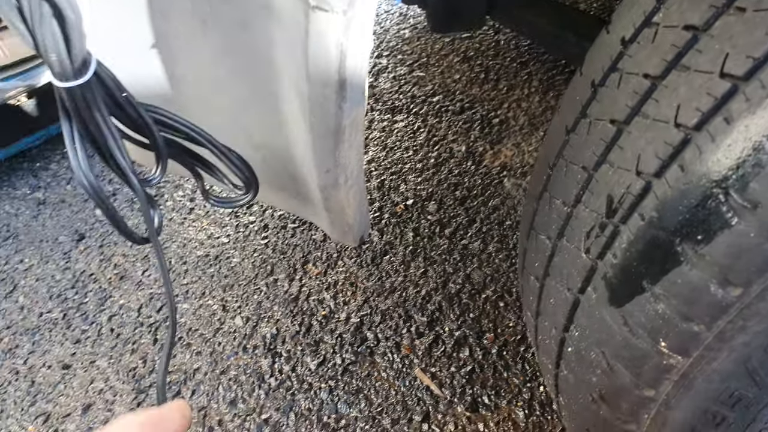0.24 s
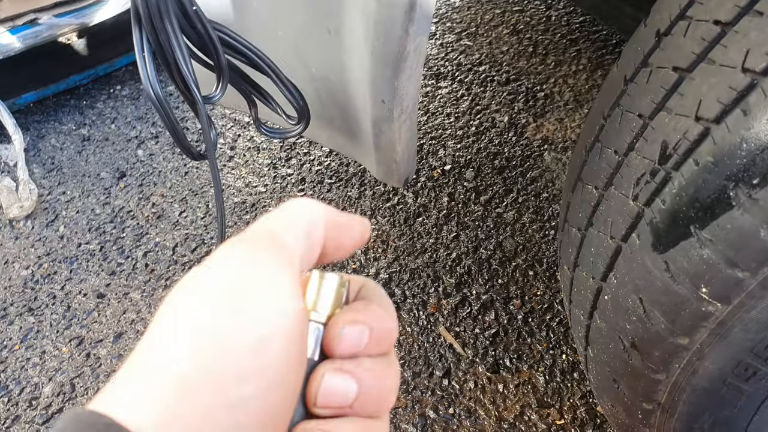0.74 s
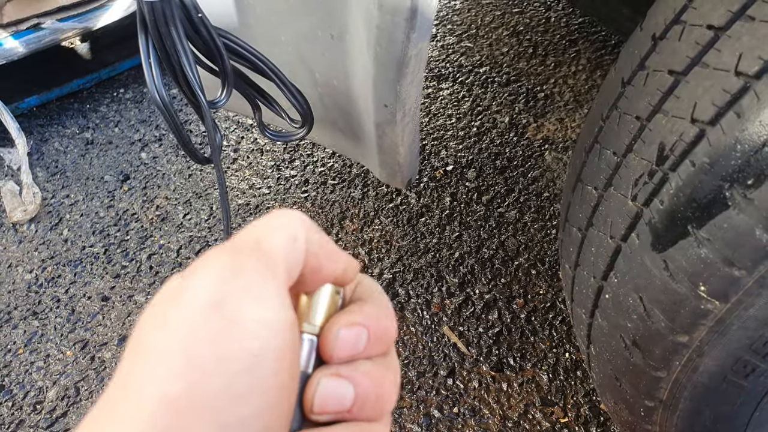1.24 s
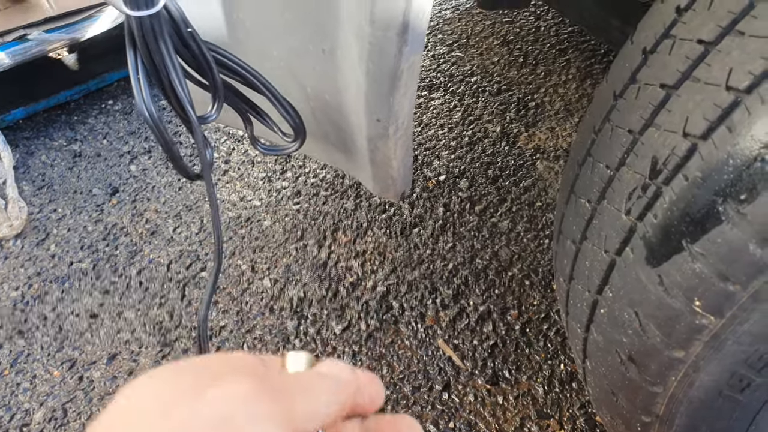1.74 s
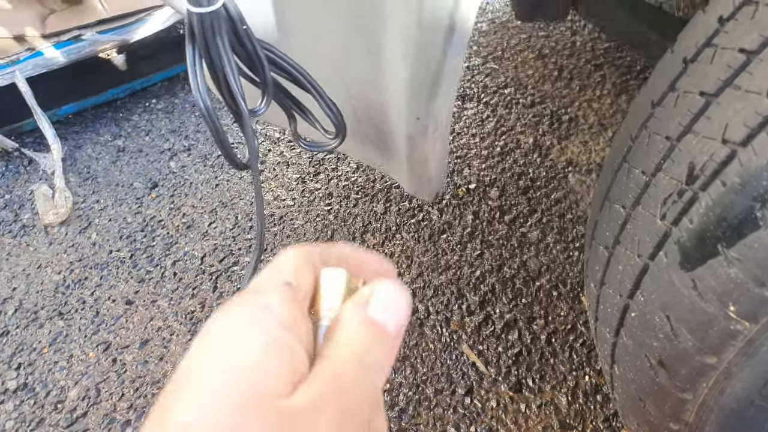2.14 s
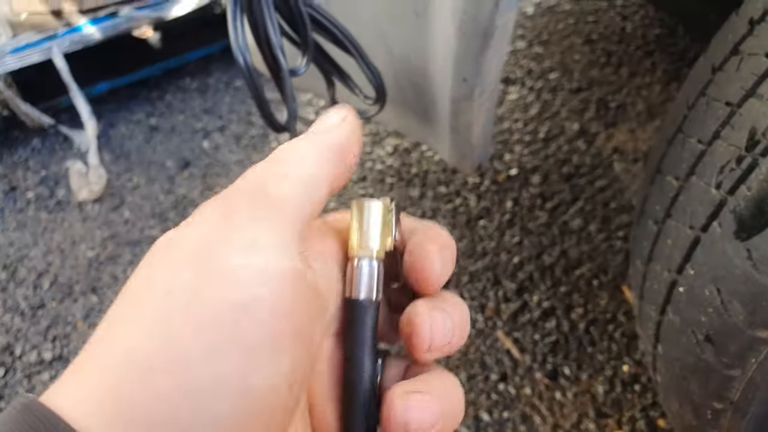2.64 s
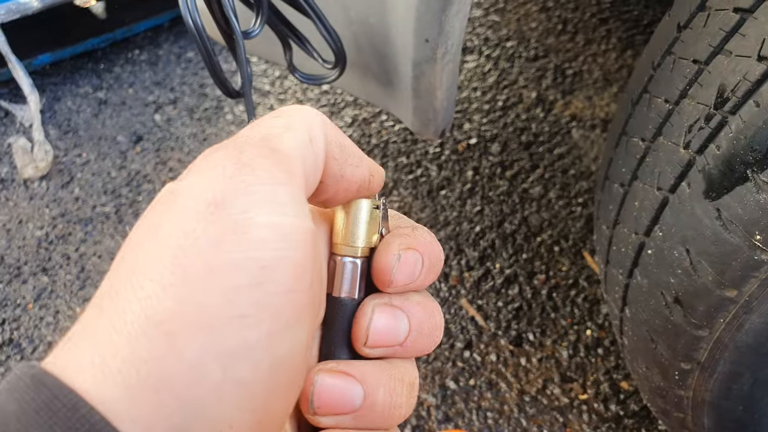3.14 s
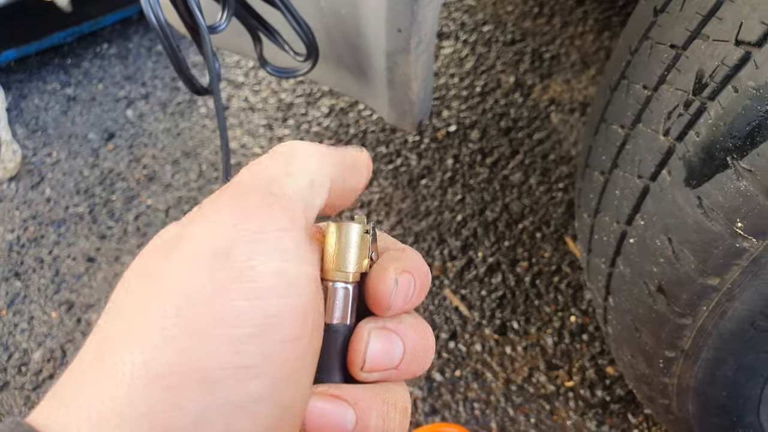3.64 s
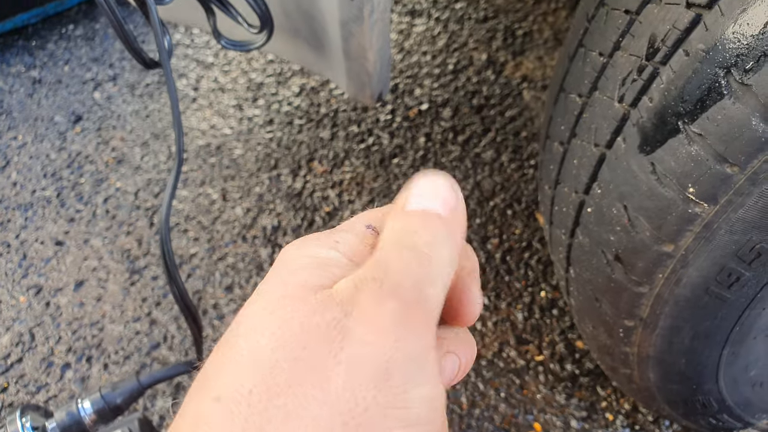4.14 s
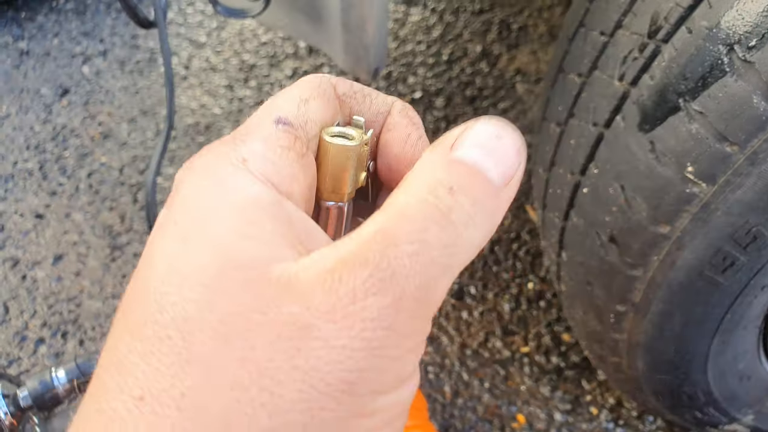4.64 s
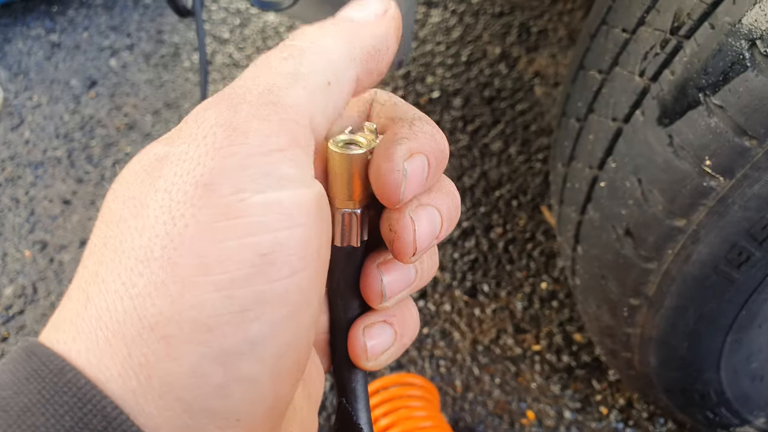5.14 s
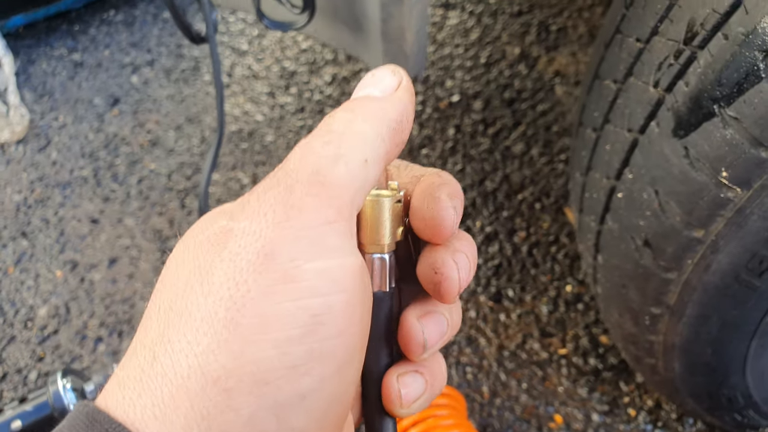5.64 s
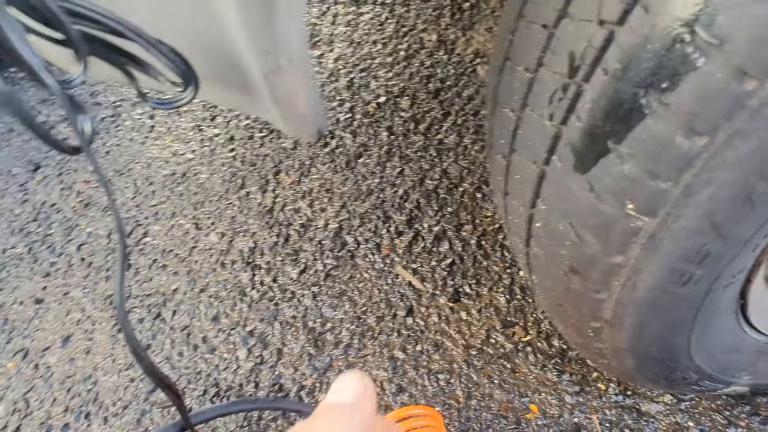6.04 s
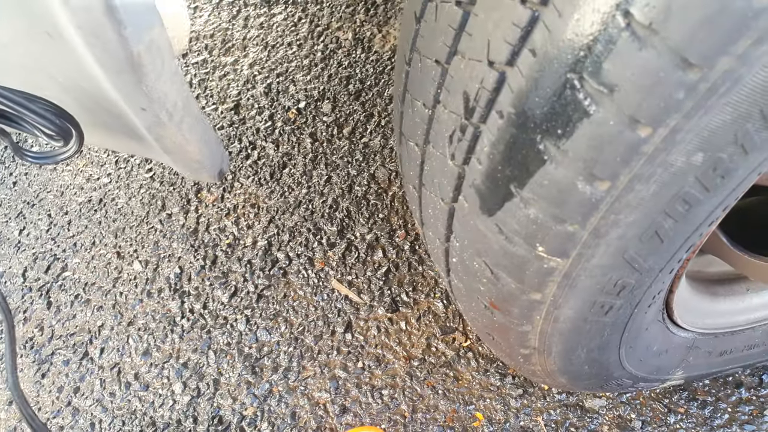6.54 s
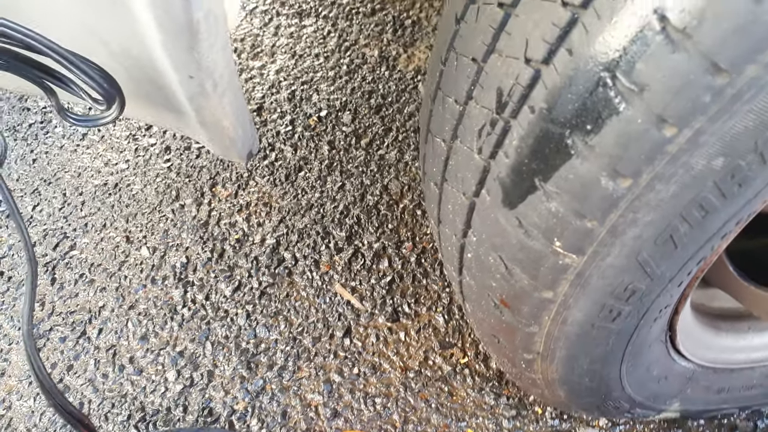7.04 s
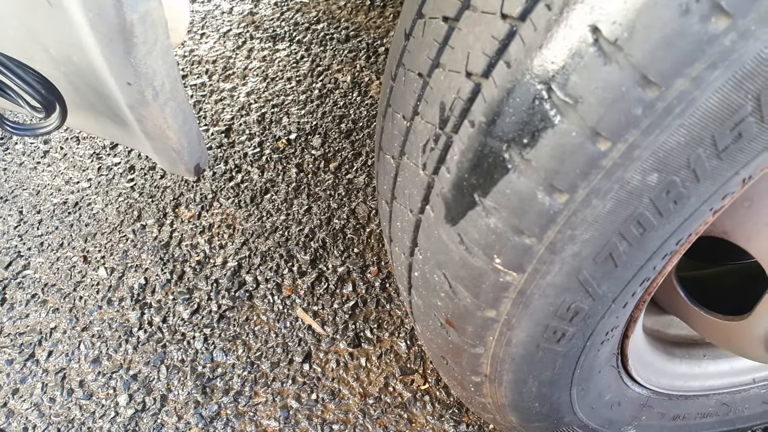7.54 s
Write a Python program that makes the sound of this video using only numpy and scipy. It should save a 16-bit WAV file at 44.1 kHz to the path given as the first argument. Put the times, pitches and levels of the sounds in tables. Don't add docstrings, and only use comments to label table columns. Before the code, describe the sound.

Steady motor hum and rattling valve buzz outdoors beneath a loud, sharp air jet whose hiss shifts as a hand moves around the nozzle.

```python
import sys
import numpy as np
from scipy import signal
from scipy.fft import rfft, irfft
from scipy.io import wavfile
from scipy.ndimage import uniform_filter1d

SR = 44100
rng = np.random.default_rng(int(sys.argv[2]) if len(sys.argv) > 2 else 0)


def magnitude_from_level(level_db):
    exponent = np.asarray(level_db, float) / 20
    return 10 ** exponent


def generate_wav(signal):
    frames = np.transpose(np.atleast_2d(signal))
    scaled = np.clip(frames, -1, 1) * 32767
    pcm = np.round(scaled).astype(np.int16)
    wavfile.write(sys.argv[1], SR, pcm)


N = 343344
SHAFT_HZ = 40

# time in seconds, thumb over the mouth in dB, wrist roll left minus right in dB,
# aim left minus right in dB, flow in dB.
GRIP = [(0.0, 0.7, -4, 3.5, 1.5), (0.43, -1.6, 2, 4.5, -11), (0.6, 0.5, -4.5, 1.5, -2.1),
        (1.58, -0.5, -3.0, 0, 0.5), (1.92, 3, 2.7, 4.5, 0.9), (2.53, -3.5, 11.5, 4.5, -3),
        (2.78, 9, 4.5, -5.5, 0.9), (3.68, -3.1, -2, -2, -2), (4.3, 1.3, -6.5, -6.5, 2.8),
        (4.63, -5.5, 7.5, 4.5, 1.7), (4.99, 0, 8, 3.5, 0), (5.19, -1.5, -0.5, -1, -3),
        (5.78, -3.5, 1.5, -2, 3.5), (6.13, 1, 0, -2, 6.5), (6.38, 1, 4, -2.6, 2), (6.97, -3.5, -4, 1.5, 3),
        (7.1, -5.5, 0, 2.7, -1.5), (7.79, -2, -2, 1.5, -0.5)]


def curve(table):
    seconds, *columns = np.transpose(table)
    return np.array([np.interp(np.arange(N) / SR, seconds, column) for column in columns])


def blur(shape, *widths):
    x = rng.standard_normal(shape)
    for axis, width in enumerate(widths):
        for _ in range(2):
            x = uniform_filter1d(x, max(int(width), 1), axis=axis)
    return x / np.std(x)


def walk(rate_hz):
    count = N // 32 + 2
    return np.interp(np.arange(N) / 32, np.arange(count), blur(count, SR / 32 / rate_hz))


def hum(turns, turned):
    pops = [
        (.3, 1),
        (.732, .61),
    ]
    # delay in ms, gain (negative on the rebound).
    echo_paths = [
        [(-.3, 1), (1.1, -.28), (2.41, -.85), (4.4, -.7), (6.12, -.36), (8.12, -.28)],
        [(0, 1), (1.7, -.56), (2.48, -.3), (4.43, -.56), (5.82, -.06), (6.62, -.12)],
    ]
    # left and right in dB,
    # then left and right in dB once the phone has turned.
    harmonics = [(-45, -43.6, -38.5, -39.5), (-38, -38.5, -38, -38.9), (-39.5, -38.5, -37.5, -37),
                 (-43, -43, -41.5, -41.5), (-39.5, -40.5, -40.5, -41), (-48.5, -50, -50, -52.5),
                 (-38.9, -37.5, -38, -36), (-49.7, -46, -44.5, -45), (-43.2, -38, -41, -37.5),
                 (-66.0, -41.0, -56.4, -39), (-53, -46, -47, -54), (-41, -63, -45.5, -71),
                 (-41, -47, -38.5, -62), (-34, -44, -34, -45.8), (-51, -50, -54, -63),
                 (-45.5, -55, -47, -48), (-47, -63, -52.8, -56.2), (-48, -46, -56.8, -53),
                 (-58, -56, -68, -54), (-54, -42, -69, -45.5), (-43.5, -53, -41, -46),
                 (-51, -54, -48, -61.0), (-44, -43.5, -41, -43), (-69, -59, -59, -53),
                 (-47, -43.6, -52, -42), (-29.5, -44.5, -31, -35), (-45, -49.5, -42.8, -52.5),
                 (-66, -57.5, -43, -61), (-47, -51, -49, -50.2)]
    ring_order, whine_order = 26, 49
    ring_wander_db, whine_db = 2.5, -53

    place = np.linspace(0, 1, num=4097)
    first_pop = pops[0][0]
    shaky = (turns + 0.00075 * walk(57)) % 1
    strike = 0.88 + 0.22 * np.cos(2 * np.pi * (shaky - first_pop - 0.17))
    struck = magnitude_from_level(ring_wander_db * walk(26)) * strike
    drift = (turns + 0.0044 * walk(40)) % 1
    k = np.arange(len(harmonics))[:, None] + 1
    pop_spectrum = -sum(size * np.exp(-2j * np.pi * k * at) for at, size in pops)
    out = []
    for port, paths in enumerate(echo_paths):
        echoes = sum(gain * np.exp(-2j * np.pi * k * ms * SHAFT_HZ / 1000) for ms, gain in paths)
        phase = np.angle(pop_spectrum * echoes)
        waves = np.sqrt(2) * np.cos(2 * np.pi * k * place + phase) * (k != ring_order)
        ring = np.sqrt(2) * np.cos(2 * np.pi * ring_order * (drift - first_pop) - 2 - 3 * port)
        before, after = [
            np.interp(shaky, place, gains @ waves) + gains[ring_order - 1] * struck * ring
            for gains in magnitude_from_level(np.transpose(harmonics)[port::2])
        ]
        whine = magnitude_from_level(whine_db) * np.cos(2 * np.pi * whine_order * shaky)
        out.append(before + (after - before) * turned + whine)
    return np.array(out) * magnitude_from_level(0.18 * walk(50))


def rumble():
    # frequency in Hz, level in dB.
    rumble_colour = [(45, -61), (90, -59.5), (200, -69), (500, -71.5), (700, -68), (1060, -65.5),
                     (1550, -66), (1900, -70.5)]
    hz, db = np.transpose(rumble_colour)
    bins_hz = np.arange(N // 2 + 1) * SR / N
    gain = magnitude_from_level(np.interp(np.log(bins_hz + 1), np.log(hz), db, left=-200, right=-200))
    mid, side = rfft(rng.standard_normal((2, N))) * gain
    apart = np.clip((bins_hz / 650) ** 2, 0, 1.3)
    return np.array([irfft(mid + sign * apart * side, N) for sign in (1, -1)]) * magnitude_from_level(37)


def valve(turns):
    pitch_hz = 1301
    start, length = -0.051, 0.377
    count = np.floor(turns - start).astype(int)
    chance = rng.standard_normal((400, 4))[count + 2].T
    slow = walk(8.8)
    reed_band = signal.butter(3, [1190, 1470], "band", fs=SR, output="sos")
    rattle = signal.sosfilt(reed_band, rng.standard_normal((2, N)))
    out = []
    for port, (lag, detune) in enumerate([(0, 1), (0.03, 1.005)]):
        part = (turns - start) % 1 - lag
        swell = np.sin(np.pi * np.clip(part / length, 0, 1) ** 1.35) ** 2
        angle = 2 * np.pi * pitch_hz * detune * (part - length / 2) / SHAFT_HZ
        missed_db = -6 * (chance[3] > 1.5)
        size_db = 1.5 * chance[0] + 1.5 * slow + missed_db + 0.71 * chance[1 + port]
        flutter = swell * magnitude_from_level(size_db) * np.sin(angle + 0.57 * chance[3] - 1.97 * port)
        port_rattle = (-1) ** port * rattle[0] + 0.68 * rattle[1]
        buzz = flutter + 0.53 * port_rattle * (1.26 + 1.5 * swell)
        out.append(0.92 * buzz / np.std(buzz))
    return np.array(out)


def nozzle(s):
    # time in seconds, length in seconds, splash in dB, puff in dB.
    flicks = [(0.145, 0.15, -0.5, 7), (0.397, 0.33, 5, 5), (0.96, 0.33, 9.5, 0), (1.137, 0.14, -6, 0.2),
              (1.295, 0.12, 9.5, 0.5), (1.508, 0.11, 8.5, 1), (1.75, 0.26, -3, -1.5), (1.914, 0.13, -5, 3),
              (2.078, 0.094, -5, -0.9), (2.386, 0.13, -1, -0.9), (2.527, 0.1, 8.5, 2),
              (2.762, 0.096, -3, 7), (2.802, 0.14, -6.5, -3.7), (2.945, 0.13, -3.5, 1),
              (3.104, 0.099, -5, 0.5), (3.26, 0.17, 1, 2.7), (3.69, 0.14, -0.8, -3), (3.79, 0.15, 7.5, 2.6),
              (4.038, 0.1, 4, -7), (4.153, 0.07, -4, 1), (4.252, 0.14, 6.5, -7), (4.476, 0.11, 2.2, 3),
              (4.866, 0.3, -5, -0.5), (5.12, 0.078, 5.5, 0.5), (5.28, 0.057, 3, 3.5), (6.085, 0.32, -2, -4),
              (6.615, 0.065, 0, 1.5), (6.747, 0.35, 0, -3.0), (6.93, 0.2, 4, -2.5),
              (7.583, 0.19, -1.5, 0.5)]
    # left in dB, right in dB.
    rest_db = [
        (-3.5, -0.28),
        (-0.65, 0.6),
        (-1.8, -0.65),
    ]
    at, *grip = np.transpose(GRIP)
    cover, roll, aim, flow = (np.interp(s, at, column) for column in grip)
    when, length, *sizes = np.transpose(flicks)
    bumps = np.exp(-(2 * (s - when[:, None]) / length[:, None]) ** 2)
    splash, puff = np.array(sizes) @ bumps
    body = flow + puff + 0.44 * splash
    top = 0.18 * flow + 0.066 * splash
    left = [0.42 * cover + 0.7 * splash, body + roll / 2, top + 0.6 * puff + aim / 2]
    right = [cover + splash - 0.11 * roll, body - roll / 2 + 0.18 * cover, top + 0.95 * puff - aim / 2]
    return np.array([left, right]) + np.transpose(rest_db)[:, :, None]


def rim(hz, s):
    rim_hz, rim_width_hz, rim_db, rim_per_aim = 11060, 660, 7.5, 0.38
    lowered_s, lowered_for_s, sag_hz = 6.47, 1.3, 655
    shade_hz, shade_width_hz, shade_db, shade_per_roll = 8200, 400, -3.5, 0.56
    at, _, roll, aim, _ = np.transpose(GRIP)
    centre_hz = rim_hz - sag_hz * np.exp(-(2 * (s - lowered_s) / lowered_for_s) ** 6)
    lift_db = rim_db - rim_per_aim * np.interp(s, at, aim)
    dip_db = shade_db - shade_per_roll * np.interp(s, at, roll)
    lift = lift_db * np.exp(-((hz - centre_hz) / rim_width_hz) ** 2)
    return lift + dip_db * np.exp(-((hz - shade_hz) / shade_width_hz) ** 2)


def jet():
    # frequency in Hz, left in dB, right in dB.
    jet_colour = [(1600, -72.5, -69), (2810, -66.5, -64), (3540, -66.5, -64), (4050, -66.5, -58),
                  (5600, -59.5, -63.5), (7700, -57.5, -59.0), (8200, -55, -66), (8960, -62.5, -57),
                  (9870, -65, -56.5), (10100, -61, -57), (10760, -58.5, -56.5), (12300, -59, -55),
                  (13600, -56.5, -60), (15500, -59, -61.5)]
    zones_hz = [4500, 9200]
    # time in seconds,
    # lower pitch in Hz, its likeness 0-1, upper pitch in Hz, its likeness 0-1.
    opposition = [(0.05, 3980, 1, 5270, .55), (0.22, 3070, 0.9, 5070, 0.7), (0.45, 2250, 1, 4920, 0.3),
                  (0.65, 2950, 0.92, 5730, 0.36), (1.6, 3000, 0.85, 5700, 0.66), (1.8, 2800, 1, 5740, .92),
                  (2.3, 2720, 0.88, 5530, 0.78), (2.6, 2680, .9, 5500, 0.58), (2.75, 2620, .8, 5440, 0.86),
                  (3.75, 2520, 0.18, 5520, 1.05), (3.95, 3250, 0.64, 6550, 0.47),
                  (4.25, 3450, 0.46, 7340, .88), (4.45, 3250, .85, 5900, 1), (4.8, 2480, 0.62, 5640, 0.64),
                  (5.4, 3080, 0.37, 6000, 0.15), (5.75, 3150, 0.84, 5770, .88),
                  (6.6, 3100, 0.88, 6120, 0.13), (7.3, 2970, 0.11, 6400, .1)]
    opposed_width_hz, top_likeness, top_scatter = 370, 0.69, 1.9
    hand_echo_s, hand_echo = 0.905 / 1000, 0.1
    jet_db, patchy_db, gust_db, flicker_db = 43.5, 2.03, 0.96, 1.5
    frame = 512
    overlap = frame * 3 // 4

    noise = rng.standard_normal((3, N))
    hz, s, (common, *own) = signal.stft(noise, SR, nperseg=frame, noverlap=overlap)
    rate, hz = 4 * SR / frame, hz[:, None]
    grid = common.shape

    at, *opposed = np.transpose(opposition)
    low_hz, low_like, high_hz, high_like = (np.interp(s, at, column) for column in opposed)
    step = (hz - low_hz) / (high_hz - low_hz)
    top = np.clip(step - 1, 0, 1)
    like = low_like + (high_like - low_like) * np.clip(step, 0, 1)
    like = like + top * (top_likeness * (0.75 + 0.34 * blur(grid, 32, rate / 4)) - like)
    share = np.sqrt(np.clip(0.99 * like - 0.12 * abs(blur(grid, 4, rate / 12)), 0, 0.98))
    lead = np.pi + 2 * np.pi * np.maximum(step, -0.25)
    lead = lead + 0.21 * blur(grid, 8, rate / 12) + top * top_scatter * blur(grid, 9.7, rate / 1.5)

    gusts = 0.96 * blur(grid, 60, rate / 20 + 25) + gust_db * blur(grid, 78, rate / 16)
    gusts = gusts + patchy_db * blur(grid, 3, rate / 5)

    moves = nozzle(s)
    zone = np.searchsorted(zones_hz, hz[:, 0])
    colour_hz, *colours = np.transpose(jet_colour)
    level_db = []
    for port in range(2):
        echo_s = hand_echo_s * (1 + 0.04 * blur(len(s), rate / 2.5))
        comb_db = 20 * np.log10(abs(1 + hand_echo * np.exp(-2j * np.pi * hz * echo_s)))
        colour_db = np.interp(np.log(hz + 1), np.log([1200, *colour_hz]), [-95, *colours[port]])
        flicker = flicker_db * blur(grid, 10.2, rate / 9)
        level_db.append(colour_db + comb_db + 0.9 * moves[port][zone] + port * rim(hz, s) + flicker)

    near = sum(np.exp(-((hz - f) / opposed_width_hz) ** 2) for f in (low_hz, high_hz))
    level_db = level_db + np.clip(near * share ** 4, 0, 1) * (np.mean(level_db, axis=0) - level_db)
    apart = np.sqrt(1 - share ** 2)
    air = [share * common * np.exp(-1j * port * lead) + apart * own[port] for port in range(2)]
    hiss = air * magnitude_from_level(level_db + gusts + jet_db)
    return signal.istft(hiss, SR, nperseg=frame, noverlap=overlap)[1][:, :N]


def scene():
    # time in seconds, turns ahead of a steady shaft.
    crank = [(0, -.39), (.3, -.272), (.6, -.185), (.9, -.121), (1.2, -.077), (1.5, -.05), (3, -.013),
             (3.6, -.032), (4.2, -.069), (5.4, -.078), (6.6, -.058), (7.8, -.019)]
    # time in seconds, nearness in dB,
    # valve buzz at the right port in dB.
    pump = [(0.0, 5.5, -27.5), (0.3, 2, -24.5), (0.6, 1.1, -29.5), (1.5, 0.4, -29), (1.8, 1.6, -27.5),
            (2.4, 2, -29), (2.7, 0.5, -33), (3.6, -1.2, -33), (4.15, -0.5, -35), (4.36, 1.5, -34),
            (4.55, -2.5, -37), (4.8, -2, -39.5), (5.4, 0, -35), (6.0, -0.7, -33), (6.4, -0.5, -31.5),
            (6.9, 1.4, -31.5), (7.4, 3, -31), (7.79, 3, -31.5)]
    turn_s, turn_takes_s = 5.97, 0.61
    valve_left_db, valve_left_turned_db = -4.5, 3.5
    t = np.arange(N) / SR
    turns = SHAFT_HZ * t + uniform_filter1d(curve(crank)[0], SR // 5)
    near_db, valve_db = curve(pump)
    turned = np.clip((t - turn_s) / turn_takes_s + 0.5, 0, 1)
    left_db = valve_left_db + (valve_left_turned_db - valve_left_db) * turned
    casing = magnitude_from_level(near_db) * (hum(turns, turned) + rumble())
    buzz = magnitude_from_level(np.array([valve_db + left_db, valve_db])) * valve(turns)
    return casing + buzz + jet()


def top_cut(x):
    return signal.sosfilt(signal.butter(12, 17030, fs=SR, output="sos"), x)


def record(dry):
    soft = np.tanh(0.6 * dry) / 0.61
    low_pass = signal.ellip(10, 0.2, 80, 15900, fs=SR, output="sos")
    return top_cut(signal.sosfilt(low_pass, soft))


dry = scene()
out = record(dry)
generate_wav(out)
```